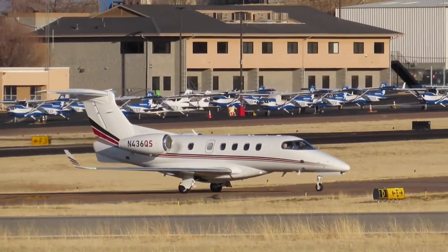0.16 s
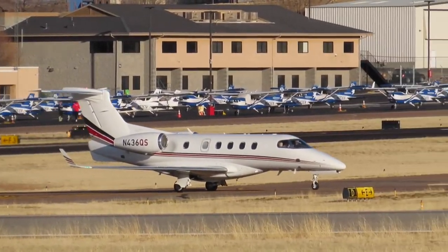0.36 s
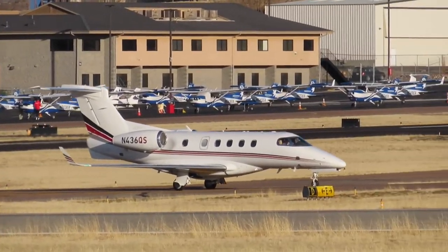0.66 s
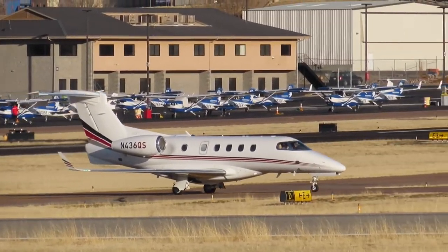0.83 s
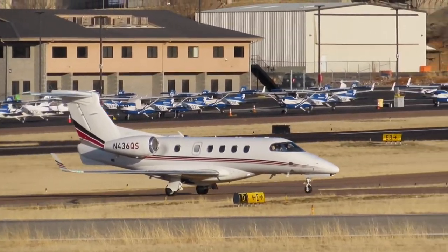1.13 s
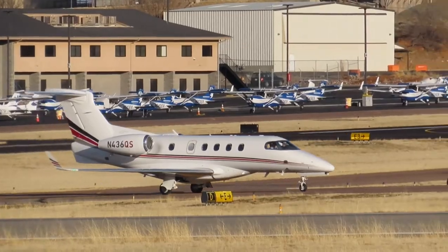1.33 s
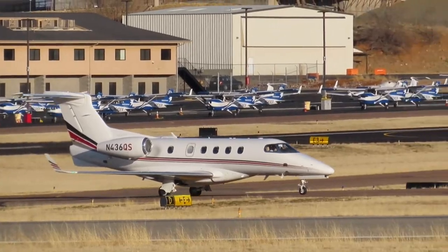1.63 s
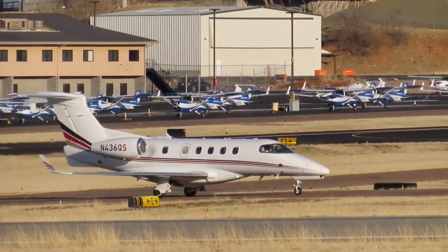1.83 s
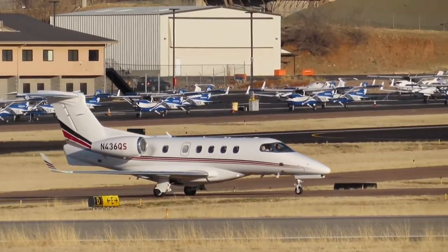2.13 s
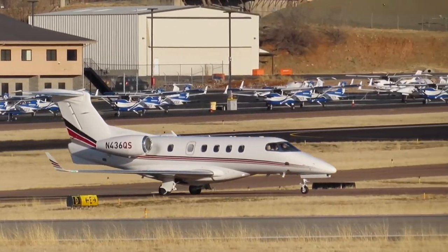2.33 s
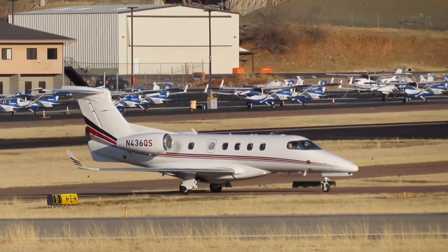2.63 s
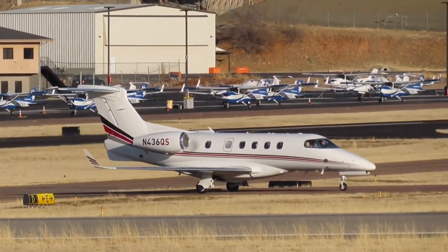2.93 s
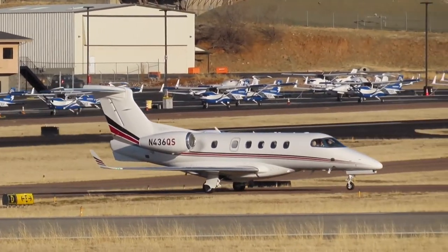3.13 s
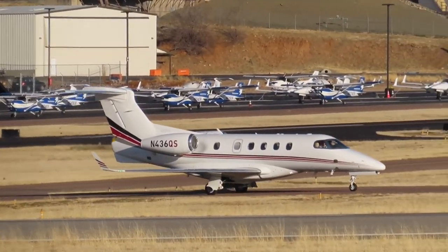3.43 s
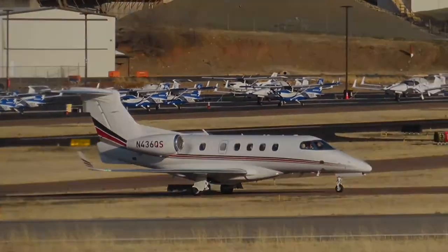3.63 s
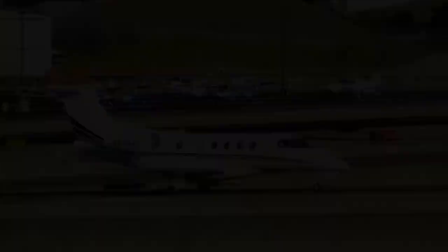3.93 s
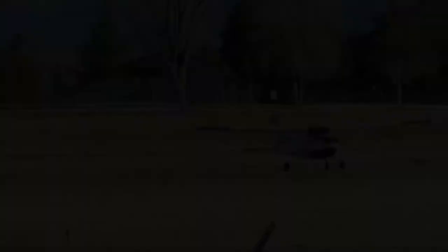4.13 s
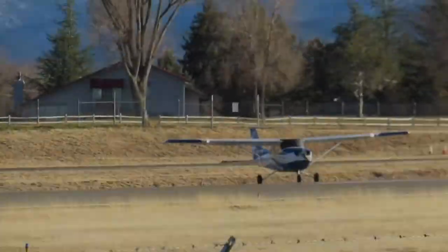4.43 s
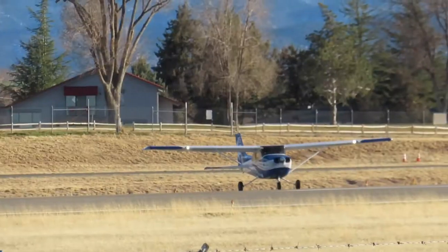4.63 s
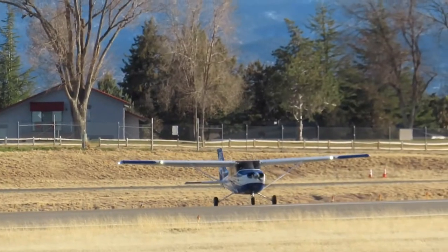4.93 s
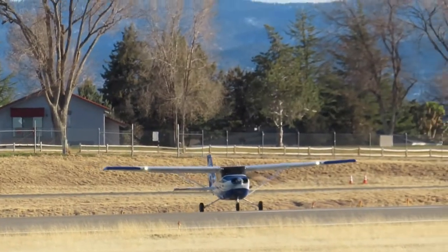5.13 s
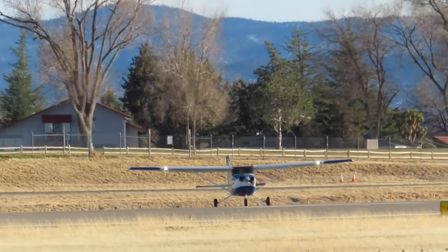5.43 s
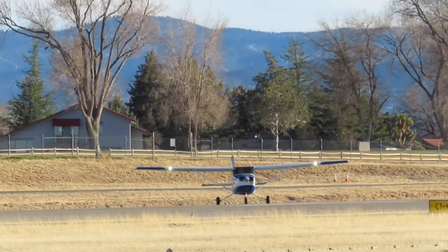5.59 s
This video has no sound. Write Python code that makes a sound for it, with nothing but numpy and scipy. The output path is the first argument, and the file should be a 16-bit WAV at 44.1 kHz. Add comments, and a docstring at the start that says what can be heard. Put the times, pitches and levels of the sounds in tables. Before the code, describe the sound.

From 0 to 4 seconds a small jet taxis at a distance across dry grass: a low turbulent rumble with irregular swells, a broad midrange roar and a faint, wavering fan whine broken into flecks. A narrow hiss fades near 0.5 seconds; the upper hiss is clearest early and grows duller, while soft rushes rise and sink within the roar. At about 4.0 the sound stops abruptly for a few hundredths of a second. A propeller plane then enters quickly: low piston engines throbbing and beating together, buffeting air and propeller wash that grows louder and brighter, strongest around 5.2 and 5.6. A thin, intermittent turbine whine slides downward, toward the left, with a faint steadier engine drone beyond. A tiny tick falls at 4.9, and quick wind puffs hit the microphones near 5.25 to 5.35. Faint hiss underlies both scenes until the end at about 5.8.

```python
"""Airfield across the grass: jet, then propeller plane

Two scenes heard by a distant pair of microphones, joined by a short, nearly silent gap.
First a jet taxis: coloured noise makes its low rumble and hissing roar, wavering sines a faint fan whine.
Then two piston engines, pulse trains through an exhaust response, beat together under propeller wash noise;
a falling turbine whine (a gliding sine) stands to the left and a steadier engine (summed sines) further off.
Scattered hum, short wind gusts, one tick and microphone hiss fill the background."""
import sys
import numpy as np
from scipy import signal
from scipy.fft import rfft, irfft
from scipy.io import wavfile
from scipy.ndimage import uniform_filter1d

SR = 44100
rng = np.random.default_rng(int(sys.argv[2]) if len(sys.argv) > 2 else 0)


def boost_factor(decibels):
    """Convert a level in decibels to a linear amplitude factor."""
    exponent = np.asarray(decibels, float) / 20
    return 10 ** exponent


def unload_wav(signal):
    """Save mono or channel-first audio to the path in sys.argv[1] as 16-bit WAV at rate SR, clipped to [-1, 1]."""
    wavfile.write(
        sys.argv[1],
        SR,
        np.round(np.clip(np.atleast_2d(signal).T, -1, 1) * 32767).astype(np.int16),
    )


N = 254016
T = np.arange(N) / SR
HZ = np.maximum(np.fft.rfftfreq(N, 1 / SR), 1)
CUT_S = 4.03  # the jet gives way to the propeller plane
FAR_BEAT_HZ = 36.6  # fundamental of the far engine, heard in both scenes


def columns(table):
    """Each column of a curve table, sample by sample."""
    s, *cols = np.transpose(table)
    return [np.interp(T, s, c) for c in cols]


def over_hz(points, edge_db=None):
    """A (Hz, value) list on the frequency grid, straight between points in log frequency."""
    hz, value = np.transpose(points)
    return np.interp(np.log(HZ), np.log(hz), value, left=edge_db, right=edge_db)


def unit(x):
    """Scale to rms 1."""
    return x / np.sqrt(np.mean(x ** 2))


def walk(rate):
    """Smooth chance of rms 1: random steps, rate per second, averaged twice."""
    k = int(SR / rate)
    steps = np.repeat(rng.standard_normal(N // k + 1), k)
    return unit(uniform_filter1d(uniform_filter1d(steps, k), k)[:N])


def bumps(rows):
    """Sum of bell-shaped bumps from (s, height, half width ms) rows."""
    return sum(height * np.exp(-.5 * ((T - s) * 1000 / ms) ** 2) for s, height, ms in rows)


def noise(colour, channels=1):
    """Steady noise of a given colour, rms 1."""
    white = rng.standard_normal((channels, N))
    return unit(irfft(rfft(white) * boost_factor(over_hz(colour, edge_db=-150)), N))


def rush(colour, flicker_db, rate, left=((1, 0), (2, 0))):
    """Turbulent noise in half-octave bands; each band flickers alone and partly with all the others."""
    lean = boost_factor(over_hz(left) / 2)  # half the left-right difference goes to each side
    pair = rfft(noise(colour)) * np.array([lean, 1 / lean])
    out, shared = 0, walk(rate)
    lowest, highest = np.log2(colour[0][0]), np.log2(colour[-1][0])
    for octave in np.arange(lowest, highest + .5, .5):
        band = np.clip(1 - 2 * np.abs(np.log2(HZ) - octave), 0, 1)
        flicker = 0.23 * shared + 0.76 * walk(rate)
        out = out + irfft(pair * band, N) * boost_factor(flicker_db * flicker)
    return unit(out)


def tone(hz, waver_hz, lead=0.):
    """A sine of rms 1 whose pitch wavers; the left channel may lead by some radians."""
    phase = 2 * np.pi * np.cumsum(hz + waver_hz * walk(30)) / SR + 2 * np.pi * rng.random()
    return np.sqrt(2) * np.sin(phase + np.array([[lead], [0]]))


def jet():
    """Exhaust rumble, roar and fan whine, all blurred by the long path over warm ground."""
    # (time [s], how far the intake faces us [dB], how clear the air path is [dB])
    course = [(0, -1.5, -2.5), (.24, -1, 3), (.55, -0.5, -3), (.7, -3, -2), (.93, -1, -7.5),
              (1.3, -3.5, -7), (1.6, -4.5, -8.5), (1.95, -6, -5.5), (2.3, -4.5, -6), (2.9, -3.5, -8),
              (3.3, -8.5, -9.5), (3.55, -6, -7), (3.75, -5, -2.5), (4, -4, 0)]
    facing, clear = columns(course)
    roar = jet_roar(facing) + hiss_streak() + passing_rushes()
    return jet_rumble() + roar + upper_roar(facing, clear) + fan_whine(facing) + far_engine_by_jet() + jet_hum()


def jet_rumble():
    """Low exhaust turbulence whose level swells now and then."""
    # (frequency [Hz], relative density [dB per Hz])
    colour = [(12, -64), (38, -15.5), (58, -7), (97, -1), (150, 0), (332, -14.5), (360, -21.5),
              (391, -19.5), (520, -23.5), (680, -35.5), (1140, -120)]
    # (time [s], swell [dB], half width [ms])
    swells = [(.08, 0, 18), (.24, 4, 15), (.45, 2.5, 53), (.72, 4.5, 65), (1.56, 4, 39), (1.84, 5.5, 24),
              (2.06, 4, 85), (2.36, 2.5, 16), (2.7, 1.5, 240), (3.29, 3, 35), (3.7, 3.5, 350)]
    return boost_factor(-34 + bumps(swells)) * rush(colour, flicker_db=1.5, rate=12)


def jet_roar(facing):
    """The middle of the jet's turbulent noise, louder as the intake turns to us."""
    # (frequency [Hz], relative density [dB per Hz])
    colour = [(240, -45), (400, -20.5), (513, -12), (743, -3), (835, -3), (927, -2), (1120, -0.5),
              (1410, -9), (1500, -12), (1950, -44), (3300, -120)]
    return boost_factor(-34 + 0.57 * facing) * rush(colour, flicker_db=0.8, rate=8.9)


def upper_roar(facing, clear):
    """Three hissing bands that the clearness of the air brightens and dulls, most of all the highest."""
    # per band: (frequency [Hz], relative density [dB per Hz])
    colours = [
        [(1300, -26), (1420, -28), (1580, 6.5), (1750, 3.5), (1950, 0), (2100, -40)],
        [(1800, -28), (1950, -7), (2100, 3), (2300, 1), (2600, -2.5), (2850, -13.5), (3000, -39)],
        [(2600, -21), (2850, 0), (3300, -0.5), (4000, -9), (4400, -5.5), (5000, -31), (6000, -47)],
    ]
    # low to high: (base level [dB], share of facing [dB per dB], share of clearness [dB per dB])
    levels = [(-43.5, 1.5, 0.032), (-45.5, 0.05, 0.8), (-58.5, 0.46, 1.08)]
    out = 0
    for colour, (db, facing_share, clear_share) in zip(colours, levels):
        gain = boost_factor(db + facing_share * facing + clear_share * clear)
        out = out + gain * rush(colour, flicker_db=1.6, rate=11)
    return out


def hiss_streak():
    """A narrow band of hiss that fades away early on."""
    # (frequency [Hz], relative density [dB per Hz])
    colour = [(1440, -35), (1520, -3), (1560, -4), (1610, -10), (1700, -20)]
    end_s, fade_s = 0.51, .04
    return boost_factor(-43.5) / (1 + np.exp((T - end_s) / fade_s)) * noise(colour)


def passing_rushes():
    """Narrow bands of noise that rise and sink within the roar."""
    # (time [s], level [dB], half width [ms], centre frequency [Hz])
    rushes = [(.2, -64, 90, 3580), (1.2, -65, 130, 3320), (1.55, -50, 190, 1880), (1.9, -47.5, 200, 2030),
              (2.5, -61, 100, 2640), (3.45, -45.5, 450, 660), (3.9, -57, 150, 2590), (.1, -47, 40, 340),
              (.7, -46, 250, 250), (1.55, -38.5, 170, 65), (3.7, -42, 280, 60)]
    # (share of the centre frequency [ratio], relative density [dB per Hz])
    band_shape = [(.75, -30), (.9, -5), (1, 0), (1.1, -5), (1.25, -30)]
    out = 0
    for s, db, ms, hz in rushes:
        colour = [(hz * share, density) for share, density in band_shape]
        out = out + bumps([(s, boost_factor(db), ms)]) * noise(colour)
    return out


def fan_whine(facing):
    """Fan tone and its octave; turbulence on the path breaks them into flecks."""
    fan_hz, blur_hz = 1152, 7.0
    out = 0
    for multiple, db in ((1, -40.5), (2, -67)):  # base level [dB] where facing is 0
        out = out + boost_factor(db + 4.0 * walk(28)) * tone(multiple * fan_hz, multiple * blur_hz)
    return boost_factor(2.3 * facing) * out


def plane():
    """Engine beat, buffeting air and propeller wash that grows and brightens with blade load."""
    # (time [s], blade load [dB])
    run_up = [(4.06, -1.5), (4.4, 0.4), (4.75, 1.5), (5.19, 4), (5.25, 1), (5.5, 2), (5.61, 3.5), (5.63, 6),
              (5.76, 4)]
    load, = columns(run_up)
    low = boost_factor(-1) * engines() + boost_factor(-5) * buffeting()
    return boost_factor(-21) * low + propeller_wash(load) + plane_hum()


def engines():
    """Two engines a few firings a second apart beat against each other through like exhausts."""
    # exhaust response: (frequency [Hz], relative gain [dB])
    exhaust = [(20, -50.5), (43, -14), (65, -10), (86, 1), (108, -5), (129, 1), (145, -7.5), (172, -18),
               (230, -13.5), (300, -26), (450, -52.5), (900, -100)]
    near_hz = 42.95 - .2 * (T - 5)  # sags by .2 Hz per second
    second_hz = np.full(N, 46.3)
    pulses = firings(near_hz, scatter_db=2.2, jitter_ms=.6)
    pulses = pulses + boost_factor(-4) * firings(second_hz, scatter_db=2.5, jitter_ms=.7)
    # causal exhaust response: fold the cepstrum of the log gain
    cepstrum = irfft(np.log(boost_factor(over_hz(exhaust, edge_db=-100))), N)
    cepstrum[1:N // 2] *= 2
    cepstrum[N // 2 + 1:] = 0
    return unit(irfft(rfft(pulses) * np.exp(rfft(cepstrum)), N))


def firings(hz, scatter_db, jitter_ms, start_turn=0.258):
    """One pulse per firing, each a little early or late, strong or weak."""
    in_step_s = 4.55  # every engine passes start_turn here
    turns = np.cumsum(hz) / SR
    turns = turns - np.interp(in_step_s, T, turns) + start_turn
    count = np.arange(int(turns[0]) + 1, int(turns[-1]))
    timing, strength = rng.standard_normal((400, 2))[count].T
    at = np.interp(count, turns, T) + jitter_ms * timing / 1000
    pulses = np.zeros(N)
    pulses[np.clip((at * SR).astype(int), 0, N - 1)] = boost_factor(scatter_db * strength)
    return pulses


def buffeting():
    """Low turbulent noise of buffeting air, flickering strongly, rms 1."""
    # (frequency [Hz], relative density [dB per Hz])
    colour = [(12, -59), (20, -22.5), (38, -6.5), (70, 4.5), (110, 0), (150, 3), (230, -6), (300, -19.5),
              (425, -24), (500, -26.5), (650, -62)]
    return rush(colour, flicker_db=5.0, rate=9.1)


def propeller_wash(load):
    """Turbulent noise in three ranges; the top one grows fastest with blade load."""
    # each colour: (frequency [Hz], relative density [dB per Hz])
    main_colour = [(260, -44), (450, -13.5), (477, -16), (577, -6), (766, -1), (977, -9), (1130, -10),
                   (1240, -8), (1630, -14.5), (1850, -27.5), (2400, -59), (4070, -120)]
    upper_colour = [(1700, -26), (1850, -8.5), (2030, 1.5), (2250, -1.5), (2450, -12.5), (2700, -29.5)]
    top_colour = [(2200, -28.5), (2450, 1), (2900, 4), (3500, -14.5), (4500, -26)]
    # (frequency [Hz], left minus right [dB])
    side = [(60, 0.0), (91, 0.0), (140, 0.0), (210, -5.5), (320, -1), (490, 0), (740, 0), (1130, 2),
            (1710, 6), (2600, 2)]
    wash = boost_factor(-36.5 + load) * rush(main_colour, flicker_db=1.0, rate=10, left=side)
    upper = boost_factor(-52.5 + 0.81 * load) * rush(upper_colour, flicker_db=0.5, rate=10, left=side)
    top = boost_factor(-75 + 3.3 * load) * rush(top_colour, flicker_db=2.5, rate=7.5)
    return wash + upper + top


def turbine_whine():
    """A turbine spooling down: a falling, wavering sine, louder and leading in phase on the left."""
    # (time [s], frequency [Hz])
    pitch = [(4.06, 2300), (4.42, 2265), (4.75, 2245), (4.99, 2198), (5.2, 2163), (5.39, 2098),
             (5.55, 2065), (5.76, 2000)]
    side_db = np.array([[2.5], [-2.5]])
    return glimpses() * boost_factor(1.6 * walk(40) + side_db) * tone(columns(pitch)[0], 8.0, lead=.7)


def glimpses():
    """Gain of the whine: each stretch rises to its peak, sags, then drops away."""
    # (start [s], peak after [s], length [s], peak level [dB])
    stretches = [(4.05, .03, .18, -52.5), (4.405, .04, .33, -50), (4.7, .16, .2, -50),
                 (4.97, .03, .14, -43.5), (5.1, .09, .2, -47.5), (5.335, .055, .105, -40),
                 (5.46, .02, .045, -42), (5.52, .025, .05, -49), (5.61, .02, .05, -51)]
    edge_db, fade_db_per_s = -6, 1200
    out = 0
    for s, rise, length, db in stretches:
        shape = np.interp(T, [s, s + rise, s + length], [edge_db, 0, edge_db])
        outside = np.maximum(s - T, 0) + np.maximum(T - s - length, 0)
        out = np.maximum(out, boost_factor(db + shape - fade_db_per_s * outside))
    return out


def far_engine():
    """Clean overtones of a steadier engine far off, each a wavering sine."""
    # (multiple of the fundamental [count], level [dB])
    orders = [(9, -55.5), (10, -51), (11, -51.5), (12, -50), (14, -59.5)]
    return sum(boost_factor(db + 1.5 * walk(11)) * tone(k * FAR_BEAT_HZ, 0.6) for k, db in orders)


def far_engine_by_jet():
    """One overtone of the far engine, a slowly swelling sine behind the jet."""
    return boost_factor(-58.5 + 1.5 * walk(1.6)) * tone(10 * FAR_BEAT_HZ, 0.74)


def around(colour, db):
    """The scattered hum of the field: flickering noise of opposite sign in the two channels."""
    return boost_factor(db) * rush(colour, flicker_db=5.0, rate=8) * np.array([[1], [-1]])


def jet_hum():
    """Scattered hum of the field around the jet."""
    # (frequency [Hz], relative density [dB per Hz])
    colour = [(35, -49), (60, -44), (195, 1), (457, -0.5), (529, -7), (746, -3), (810, 4), (954, 7),
              (1050, 1), (1370, -9), (1720, 5.5), (1960, -25), (3000, -33), (3900, -43), (6600, -120)]
    return around(colour, -56)


def plane_hum():
    """Scattered hum of the field around the propeller plane."""
    # (frequency [Hz], relative density [dB per Hz])
    colour = [(35, -34), (60, -5), (92, -1), (262, -7.5), (457, 2), (565, -8), (986, 2), (1260, -16),
              (1510, 0), (1930, -12), (2230, -15.5), (2390, -16.5), (3000, -26), (3900, -45), (6600, -120)]
    return around(colour, -47.5)


def wind():
    """Short gusts brush the microphone and push its two ports in opposite ways."""
    # (time [s], level before the port gains [dB], half width [ms])
    puffs = [(1.56, -53, 34), (2.1, -57, 41), (3.46, -50.5, 29), (4.1, -53.5, 37), (5.25, -36, 5.7),
             (5.27, -33, 5.2), (5.305, -41, 8), (5.335, -42, 12), (5.365, -41, 14)]
    # (frequency [Hz], relative density [dB per Hz])
    colour = [(60, -13), (200, 1.5), (400, -3), (600, -12), (900, -4), (1300, -12), (2500, -35)]
    gust = bumps([(s, boost_factor(db), ms) for s, db, ms in puffs]) * noise(colour)
    return gust * np.array([[.8], [-1.2]])


def tick():
    """Something ticks once near the microphone: a very short burst of high noise."""
    # (frequency [Hz], relative density [dB per Hz])
    colour = [(8000, -30), (10000, -2), (13000, 0), (15500, -5)]
    return bumps([(4.914, boost_factor(-62.5), .6)]) * noise(colour)


def microphone_hiss():
    """Each microphone's own steady noise, independent in the two channels."""
    # (frequency [Hz], relative density [dB per Hz])
    colour = [(200, -48), (1000, -3), (2000, -0.5), (3200, -7), (4500, -8.5), (6500, -13), (9000, -18),
              (12000, -25.5), (14500, -29), (16500, -37)]
    return boost_factor(-54.5) * noise(colour, channels=2)


def cut():
    """Gain of the join: the first scene stops within milliseconds; after a gap the second fades in."""
    out_s, out_db_per_ms = 4.006, 18
    in_s, in_length_s, gap_db = 4.0445, .024, -68
    fade_out = boost_factor(-out_db_per_ms * 1000 * np.clip(T - out_s, 0, 1))
    fade_in = (T - in_s) / in_length_s
    return np.clip(np.where(T < CUT_S, fade_out, fade_in), boost_factor(gap_db), 1)


def scene():
    """The taxiing jet, then the propeller plane and its neighbours, with wind and a tick at the microphone."""
    second = plane() + turbine_whine() + far_engine()
    return np.where(T < CUT_S, jet(), second) + wind() + tick()


def roll_off(x):
    """The treble ends steeply here."""
    return signal.sosfilt(signal.butter(12, 15700, fs=SR, output="sos"), x)


def record(dry):
    """Microphone hiss joins the sound, and the join between the scenes shapes both."""
    mix = (dry + microphone_hiss()) * cut()
    return roll_off(mix)


dry = scene()
out = record(dry)
unload_wav(out)
```